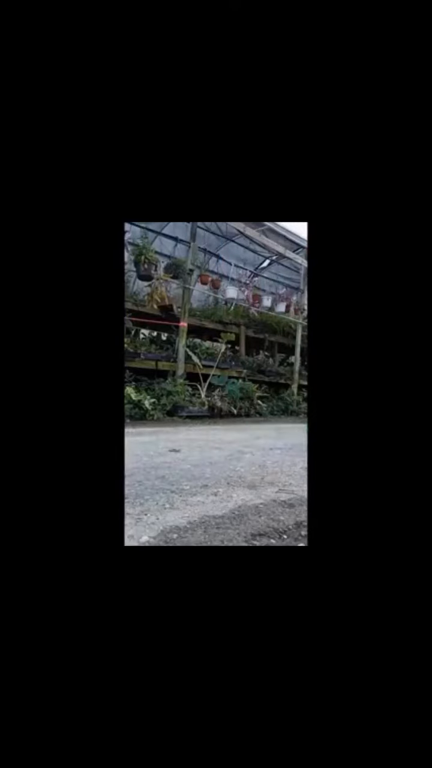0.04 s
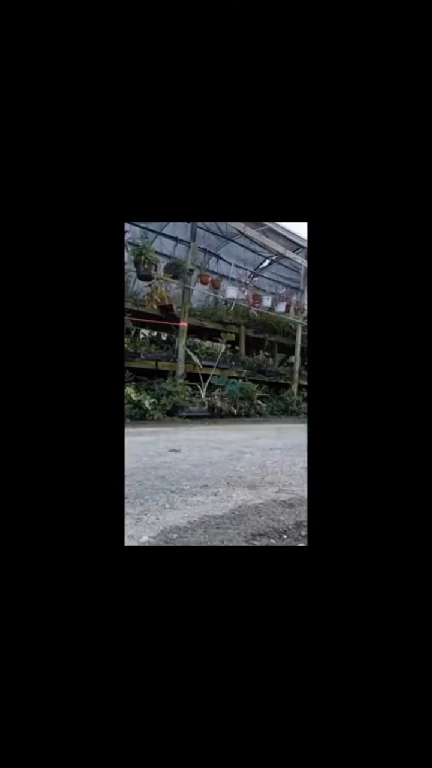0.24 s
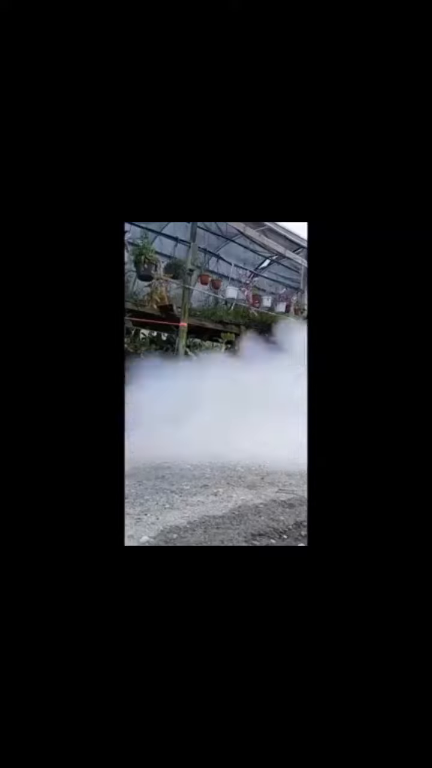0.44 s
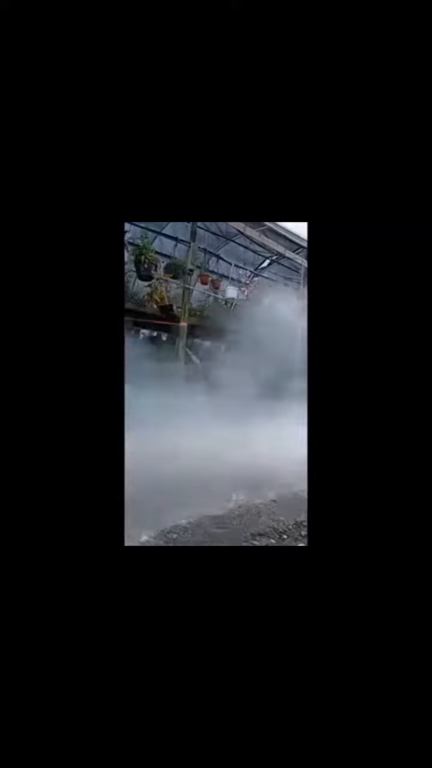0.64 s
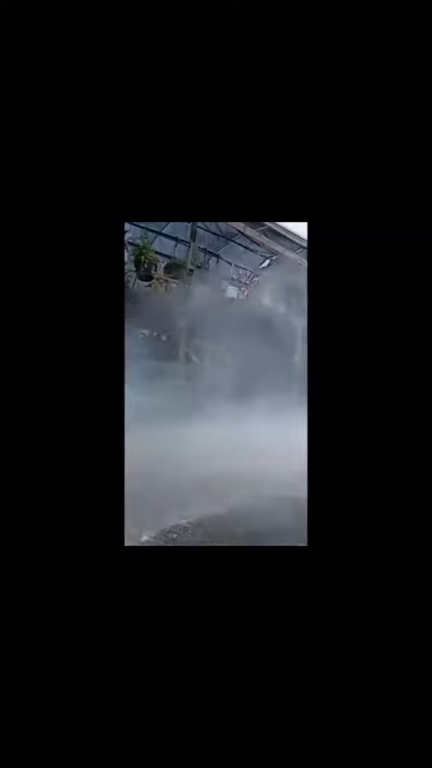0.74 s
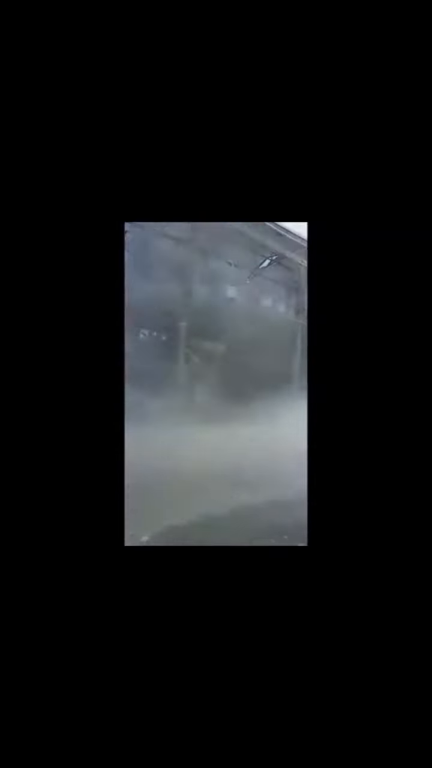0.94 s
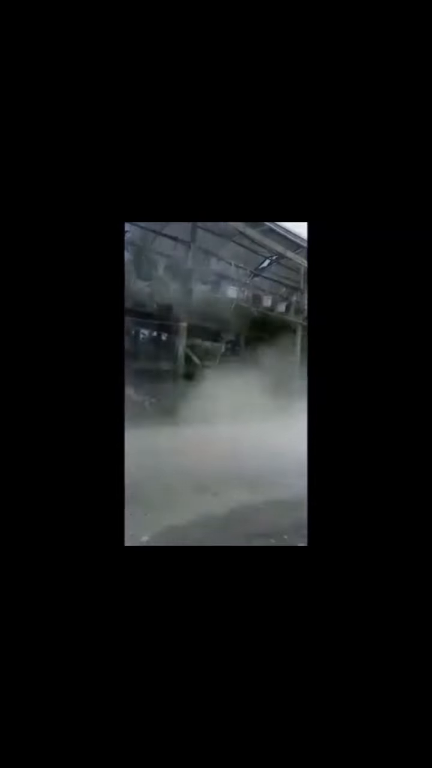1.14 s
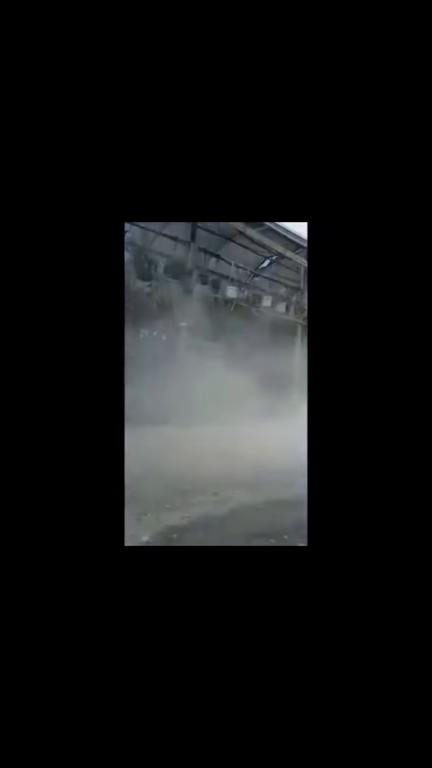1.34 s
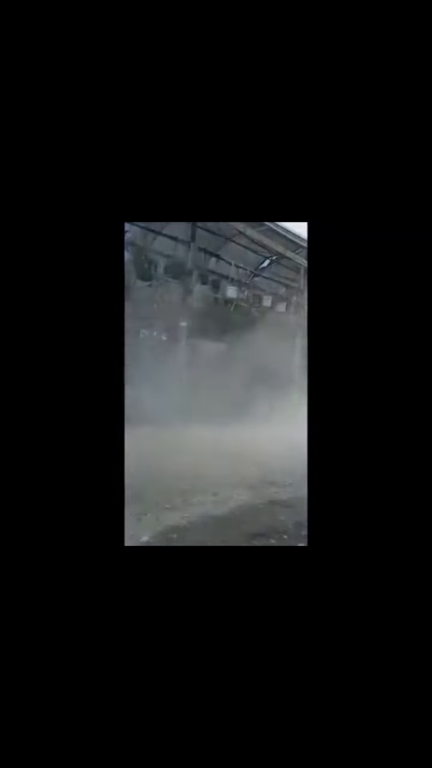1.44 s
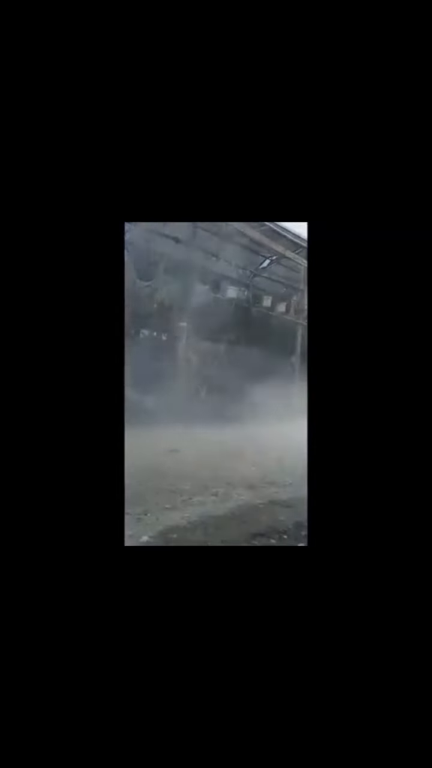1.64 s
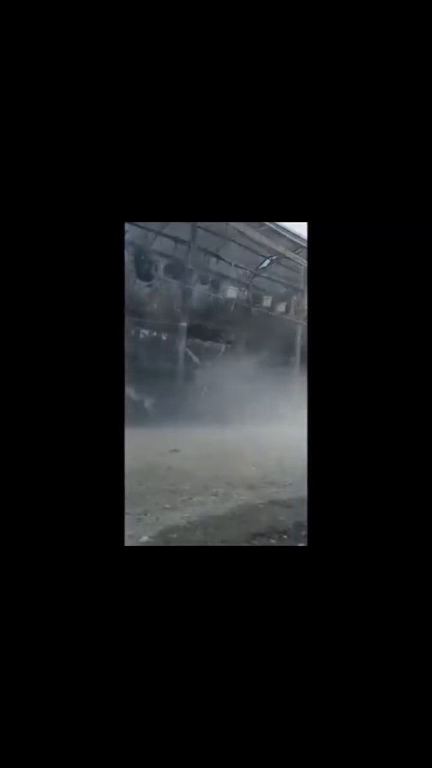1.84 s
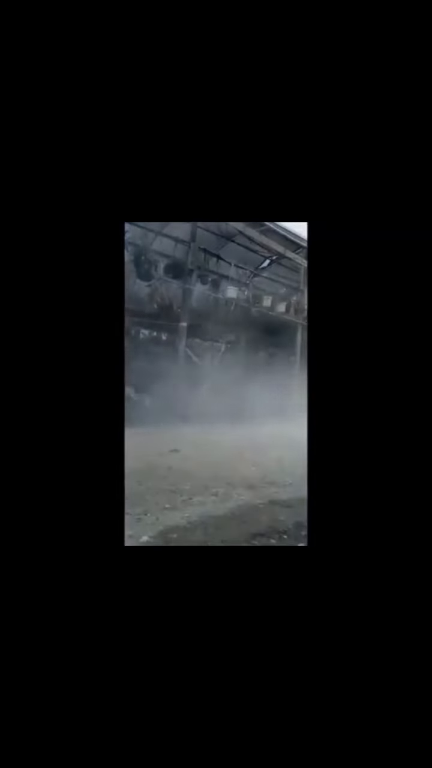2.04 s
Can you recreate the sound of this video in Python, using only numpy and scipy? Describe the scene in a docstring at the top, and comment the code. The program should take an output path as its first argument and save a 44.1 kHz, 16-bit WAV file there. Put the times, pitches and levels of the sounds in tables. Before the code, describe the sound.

A small rocket motor sputters, pops and bursts into a crackling roar, then hisses away outdoors

```python
"""A small rocket motor burns on open gravel, a few metres from a phone: its jet is shaped, flickering noise.
First the fuse sputters in short bursts of grit and the igniter pops as a sharp pressure pulse. The jet swells
to a crackling roar that overloads the microphone, settles to a hiss and dies away; gliding bands of noise
make brief nozzle whistles, and low rumble makes gusts. A distant machine hums as two wandering tones over
coloured outdoor noise; both sink while the jet is loud."""
import sys
import numpy as np
from scipy import signal
from scipy.fft import rfft, irfft
from scipy.io import wavfile

SR = 44100
rng = np.random.default_rng(int(sys.argv[2]) if len(sys.argv) > 2 else 0)


def output_pcm(signal):
    """Save a mono or channel-first signal as 16-bit PCM at the path in sys.argv[1].

    Samples are clipped to [-1, 1] before scaling.
    """
    pcm = np.clip(np.atleast_2d(signal).T, -1, 1) * 32767
    wavfile.write(sys.argv[1], SR, np.round(pcm).astype(np.int16))


N = 92610  # length of the scene in samples (2.1 s)

# rise and fall of the outdoor noise, relative to OUTDOOR_DB: (time [s], level [dB])
OUTDOOR_LEVEL = [(0, 2.5), (.05, 3.5), (.075, 1), (.125, -0.5), (.155, 2.5), (.185, 1.5), (.215, -9),
                 (.255, 1.5), (.33, -5.5), (.6, -10), (1.15, -11.5), (1.45, -18), (1.62, -23), (1.76, -11),
                 (1.82, -2), (1.86, 2), (2.1, 0.5)]
# tone balance of the outdoor noise: (frequency [Hz], relative level [dB per Hz])
OUTDOOR_COLOUR = [(25, -24), (70, -8.5), (130, 2.5), (200, -1.5), (400, -9), (550, -3), (700, -7.5),
                  (850, -4), (1100, -8), (1600, -6.5), (2700, -13.5), (4000, -15), (5300, -23.5),
                  (7400, -19), (10000, -30.5), (13500, -44), (14500, -65)]
OUTDOOR_DB = -31.5
# loudness of the distant machine's low tone, before its flutter: (time [s], level [dB])
HUM_LEVEL = [(0, -39), (.185, -41), (.225, -60), (.265, -34), (.3, -43), (.7, -57), (.85, -55), (1.17, -47),
             (1.45, -51), (1.6, -62), (1.84, -56), (1.9, -32), (1.945, -39), (1.99, -30.5), (2.1, -34)]
# loudness of its upper tone, before its flutter: (time [s], level [dB])
UPPER_HUM_LEVEL = [(0, -37), (.04, -33.5), (.185, -39.5), (.215, -60), (.255, -34.5), (.31, -38),
                   (.37, -48), (.9, -58)]
HUM_HZ, UPPER_HUM_HZ = 126.3, 238.7
HUM_WANDER, HUM_FLUTTER_DB = .005, .7  # typical pitch drift as a fraction, typical level drift

# sputters of the fuse: (time [s], level before the burst shape [dB], low-pass corner [Hz])
SPUTTERS = [(.008, -24, 12000), (0.028, -18, 1500), (0.051, -24, 7000), (0.083, -24.5, 9000),
            (0.101, -26, 9000), (0.138, -22.5, 1100), (0.145, -21.5, 12000), (0.159, -22, 1200)]
# tone balance of the fuse and the gravel scatter: (frequency [Hz], relative level [dB per Hz])
SPUTTER_COLOUR = [(50, -15), (150, -11), (600, -2), (1500, -1.5), (2700, -6), (3800, 0.5), (5300, -17.5),
                  (7400, -6), (9500, -15.5), (14000, -23)]
SPUTTER_ATTACK_S, SPUTTER_DECAY_S = 0.00053, 0.0072

# sharp pops, the igniter and then full thrust: (time [s], pulse level [dB])
POPS = [(.20531, -2.3), (.3775, -1)]
POP_LENGTH_S, POP_FRONT_S = .00007, .000025
POP_BOUNCE_S, POP_BOUNCE_DB = .00037, -2.5  # spacing and relative level of the bounce
POP_TAIL_DB, POP_TAIL_S = -21, .011  # gravel scatter relative to the pop, and its decay

# loudness of the jet's hiss before the trim HISS_DB: (time [s], level [dB])
HISS_LEVEL = [(.215, -21.5), (.25, -20.5), (.33, -16.5), (.365, -13.8), (.382, -11), (.44, -8), (.55, -8.5),
              (.67, -14), (.99, -14), (1.06, -14.5), (1.2, -14), (1.35, -13.5), (1.4, -15), (1.47, -12.5),
              (1.51, -14), (1.725, -16), (1.768, -22.5), (1.8, -20), (1.93, -26.3), (2.02, -27), (2.1, -33)]
# loudness of the jet's low roar before the trim ROAR_DB: (time [s], level [dB])
ROAR_LEVEL = [(.21, -62), (.26, -29), (.357, -29), (.374, -20.5), (.43, -13), (.58, -17), (.66, -17.5),
              (.8, -20), (.92, -25), (1.25, -32.5), (1.72, -36), (1.8, -42)]
HISS_DB, ROAR_DB = -0.36, -0.5
# tone balance of the hiss while the motor flares: (frequency [Hz], relative level [dB per Hz])
FLARE_COLOUR = [(100, -44), (600, -14), (1300, -4.5), (2500, -5.5), (2900, -5.5), (3400, 0), (4050, -1),
                (4400, -6.5), (4850, -10.5), (5600, -8), (6500, -2.5), (7100, 2), (7900, 0), (8500, -2),
                (9300, -3.5), (10400, -7), (11600, -10.5), (12700, -14), (13500, -16), (15500, -29)]
# tone balance of the hiss once settled: (frequency [Hz], relative level [dB per Hz])
HISS_COLOUR = [(100, -29), (300, -19.5), (600, -13.5), (1200, -9.5), (2000, -6.5), (2900, -2.5),
               (4100, 0.5), (4600, -3.5), (5200, -9.5), (5900, -8.5), (6500, -4), (7100, -.5), (7900, -0.5),
               (8500, -4.5), (9700, -4), (11500, -8.5), (12700, -12), (13600, -15.5), (14100, -57)]
SETTLE_S, SETTLE_LENGTH_S = 0.43, 0.25  # start and length of the change from flare to settled hiss
# tone balance of the roar as it breaks out: (frequency [Hz], relative level [dB per Hz])
BREAKOUT_COLOUR = [(40, -25), (120, -12), (300, -4.5), (600, 2), (1200, 3.5), (1700, 4.5), (2400, -1.5),
                   (3500, -2), (5000, -21), (8000, -0.5), (14000, -28)]
# tone balance of the roar afterwards: (frequency [Hz], relative level [dB per Hz])
ROAR_COLOUR = [(40, -25), (120, -11.5), (300, -6.5), (600, -0.5), (1000, 2.5), (1450, 3), (2400, 4.5),
               (3500, -3.5), (5000, -24), (8000, -1), (13500, -27), (14500, -55)]
BREAKOUT_END_S, BREAKOUT_FADE_S = .44, .06
# dulling of the hiss as the chamber empties: (time [s], gain of the top treble [dB])
TREBLE = [(1.75, 1), (1.9, -2.5), (2.1, -25)]
TREBLE_HZ = 7150
# resonances that colour the jet, before they wander: (centre [Hz], width [Hz], lift [dB])
RESONANCES = [(866, 70, 2.5), (1053, 69, 2), (1235, 84, 3.5), (1460, 64, 3.5), (1620, 50, 2.5),
              (1820, 120, 2), (2300, 130, 3), (2680, 160, 1)]
RESONANCE_DRIFT, RESONANCE_DRIFT_PER_S = .02, 9  # pitch shift as a fraction, changes per second
# spurts of bright sizzle before the jet's flutter: (start [s], length [s], level [dB])
SIZZLES = [(0.181, 0.037, -37), (1.004, 0.13, -18), (1.3, 0.087, -21)]
SIZZLE_HZ, SIZZLE_WIDTH_HZ = 9350, 3700
# flicker of the exhaust's eddies, strongest in the blast: (time [s], spread [dB])
EDDIES = [(.25, 1.6), (.45, 2.2), (.7, 1.5), (1.65, 1.3), (1.8, .7)]
EDDY_DB, EDDY_PER_S = 1.5, 34.7  # flicker spread outside the jet; flicker speed everywhere
SHOCKS_PER_S, SHOCK_SPREAD_DB, SHOCK_DB = 3500, 2.5, -4
FLUTTER_DB, FLUTTER_PER_S = 0.38, 43
CATCH_S, CATCH_RISE_S = .213, .024  # when the motor catches, and how long it takes to open up
VORTICES_PER_S, VORTEX_S, VORTEX_DB = 42, .06, -14.5  # level is relative to the gas noise
VORTEX_LOW_HZ, VORTEX_HIGH_HZ = 800, 4600

# breathy resonances of the nozzle:
# (start [s], length [s], first pitch [Hz], last pitch [Hz], width [Hz], level [dB])
WHISTLES = [(0.246, 0.092, 3950, 4030, 346, -29), (.48, 0.126, 3350, 3444, 1000, -19),
            (0.472, 0.11, 4000, 4060, 300, -22.5), (0.847, .11, 3850, 3860, 300, -26),
            (1.029, 0.095, 3480, 3420, 300, -25.5), (1.101, 0.076, 4180, 4050, 170, -24),
            (1.125, .06, 3800, 3680, 170, -26), (1.263, 0.15, 4130, 4010, 150, -25.5),
            (1.407, .07, 4100, 4220, 400, -27), (1.435, 0.062, 3450, 3140, 700, -20),
            (1.596, 0.033, 3610, 3760, 250, -20), (1.946, 0.1, 2780, 2990, 170, -34),
            (1.981, 0.1, 1540, 1620, 130, -42)]

# gusts of exhaust that buffet the microphone: (start [s], length [s], level [dB])
GUSTS = [(0.406, 0.18, -27), (1.023, 0.058, -32.5), (1.294, 0.051, -36)]
# tone balance of their rumble: (frequency [Hz], relative level [dB per Hz])
RUMBLE_COLOUR = [(20, -16), (45, -9), (130, 0), (300, 0.5), (600, 2), (2000, -52)]

# echoes from the ground and nearby racks: (delay [s], level relative to the motor [dB])
ECHOES = [(.00482, -24.5), (.00682, -16.5), (0.0137, -14.5)]
CLIP_LEVEL, TOP_HZ = .9, 15600  # peak ceiling in the microphone, highest frequency kept


def undb(db):
    """Turn decibels into a gain."""
    return 10 ** (np.asarray(db) / 20)


def unit(x):
    """Scale a sound to an average strength (rms) of 1."""
    return x / (np.std(x) + 1e-12)


def noise():
    """White noise: every frequency equally strong."""
    return rng.standard_normal(N)


def clock():
    """Time of each sample in seconds."""
    return np.arange(N) / SR


def curve(rows):
    """Gain that follows (time, dB) points."""
    times, db = np.array(rows).T
    return undb(np.interp(clock(), times, db))


def colour(x, points):
    """Reshape the frequencies of x by (Hz, dB) points and scale it to rms 1."""
    hz, db = np.array(points).T
    freqs = np.maximum(np.fft.rfftfreq(N, 1 / SR), 1)
    gain = undb(np.interp(np.log(freqs), np.log(hz), db))
    return unit(irfft(rfft(x) * gain, N))


def filtered(x, hz, kind, order=2):
    """Keep part of the frequency range with a smooth (Butterworth) filter."""
    edges = np.clip(hz, 10, .45 * SR)
    return signal.sosfilt(signal.butter(order, edges, kind, fs=SR, output="sos"), x)


def walk(rate):
    """Smooth random wandering, about rate changes a second, with a spread of 1."""
    return colour(noise(), [(1, 0), (rate / 2, 0), (rate * 2, -60), (rate * 4, -120)])


def swell(start, length, edge):
    """A loudness shape that opens, holds and closes with soft edges."""
    t = clock() - start
    return (1 + np.tanh(t / edge)) * (1 + np.tanh((length - t) / edge)) / 4


def burst(start, attack, decay):
    """A quick rise and an exponential fall."""
    t = np.maximum(clock() - start, 0)
    return (1 - np.exp(-t / attack)) * np.exp(-t / decay)


def fade(start, length):
    """A straight line from 0 to 1."""
    return np.clip((clock() - start) / length, 0, 1)


def turbulence(eddy_db):
    """Mixing gas: bands of noise that flicker with their own eddies, peppered with tiny shocks."""
    edges = np.geomspace(300, 16000, 18)
    gas = filtered(noise(), edges[0], "low")  # the lowest band stays steady
    for low, high in zip(edges, edges[1:]):
        flicker = undb(eddy_db * walk(EDDY_PER_S))
        gas = gas + filtered(noise(), [low, high], "band") * flicker
    sizes = undb(SHOCK_SPREAD_DB * np.minimum(rng.exponential(size=N), 3.5))
    happens = rng.random(N) < SHOCKS_PER_S / SR
    shocks = happens * sizes * np.sign(noise())
    return unit(gas) + undb(SHOCK_DB) * unit(shocks)


def outdoor_noise():
    """Gas-like noise given an outdoor tone balance and a changing level."""
    return undb(OUTDOOR_DB) * colour(turbulence(EDDY_DB), OUTDOOR_COLOUR) * curve(OUTDOOR_LEVEL)


def machine_hum():
    """Two tones of a distant machine, each drifting slightly in pitch and level."""
    out = np.zeros(N)
    for hz, levels in [(HUM_HZ, HUM_LEVEL), (UPPER_HUM_HZ, UPPER_HUM_LEVEL)]:
        pitch = hz * (1 + HUM_WANDER * walk(13.5))
        tone = np.sqrt(2) * np.sin(2 * np.pi * np.cumsum(pitch) / SR)
        out += tone * curve(levels) * undb(HUM_FLUTTER_DB * walk(25))
    return out


def fuse():
    """Short gritty sputters before the motor catches: bursts of noise, some dull and some bright."""
    grit = colour(turbulence(EDDY_DB), SPUTTER_COLOUR)
    out = np.zeros(N)
    for start, db, corner_hz in SPUTTERS:
        sputter = unit(filtered(grit, corner_hz, "low"))
        out += undb(db) * sputter * burst(start, SPUTTER_ATTACK_S, SPUTTER_DECAY_S)
    return out


def shock(at):
    """A pressure pulse that builds, flips sharply from positive to negative, and recovers."""
    t = clock() - at
    outside_front = np.maximum(np.abs(t) - POP_FRONT_S, 0)
    return -np.tanh(t / POP_FRONT_S) * np.exp(-outside_front / POP_LENGTH_S)


def pops():
    """Each pop is a steep pressure pulse, its inverted bounce off the ground and a scatter from the gravel."""
    gravel = undb(POP_TAIL_DB) * colour(noise(), SPUTTER_COLOUR)
    out = np.zeros(N)
    for start, db in POPS:
        bounce = -undb(POP_BOUNCE_DB) * shock(start + POP_BOUNCE_S)
        scatter = gravel * burst(start, SPUTTER_ATTACK_S, POP_TAIL_S)
        out += undb(db) * (shock(start) + bounce + scatter)
    return out


def vortices():
    """Vortices shed by the jet at random moments: short tones that flare up and fade at random pitches."""
    size = int(VORTEX_S * SR)
    out, t = np.zeros(N + size), np.arange(size) / SR
    for when, pitch in rng.random((int(VORTICES_PER_S * N / SR), 2)):
        hz = VORTEX_LOW_HZ * (VORTEX_HIGH_HZ / VORTEX_LOW_HZ) ** pitch
        start = int(when * N)
        out[start:start + size] += np.hanning(size) * np.sin(2 * np.pi * hz * t)
    return undb(VORTEX_DB) * out[:N]


def lifted(x, scale):
    """Boost the resonant bands; a larger scale moves them lower in pitch."""
    freqs = np.fft.rfftfreq(N, 1 / SR) * scale
    lift_db = sum(db / (1 + (2 * (freqs - hz) / width) ** 2) for hz, width, db in RESONANCES)
    return irfft(rfft(x) * undb(lift_db), N)


def resonate(x):
    """Lift narrow bands that wander with the hot gas, without changing the overall level."""
    share = (1 + np.tanh(2 * walk(RESONANCE_DRIFT_PER_S))) / 2
    higher, lower = lifted(x, 1 - RESONANCE_DRIFT), lifted(x, 1 + RESONANCE_DRIFT)
    return unit(share * higher + (1 - share) * lower) * np.std(x)


def hiss(gas):
    """The lasting bright part of the exhaust, which settles after the flare and dulls at the end."""
    settled = fade(SETTLE_S, SETTLE_LENGTH_S)
    blend = (1 - settled) * colour(gas, FLARE_COLOUR) + settled * colour(gas, HISS_COLOUR)
    full = blend * curve(HISS_LEVEL) * undb(HISS_DB)
    dull = filtered(full, TREBLE_HZ, "low", order=1)
    return dull + (full - dull) * curve(TREBLE)


def roar(plume):
    """The low part of the exhaust, deeper as it breaks out and early to fade."""
    opened = fade(BREAKOUT_END_S, BREAKOUT_FADE_S)
    blend = (1 - opened) * colour(plume, BREAKOUT_COLOUR) + opened * colour(plume, ROAR_COLOUR)
    return blend * curve(ROAR_LEVEL) * undb(ROAR_DB)


def sizzle():
    """Spurts of bright noise in a band of high frequencies."""
    band = [SIZZLE_HZ - SIZZLE_WIDTH_HZ / 2, SIZZLE_HZ + SIZZLE_WIDTH_HZ / 2]
    spurts = sum(undb(db) * swell(start, length, length / 6) for start, length, db in SIZZLES)
    return unit(filtered(noise(), band, "band", order=3)) * spurts


def jet():
    """The exhaust: turbulent roar, hiss and sizzle, fluttering together with the uneven burn."""
    eddy_db = np.interp(clock(), *np.array(EDDIES).T)
    gas = turbulence(eddy_db) + vortices()
    plume = turbulence(eddy_db) + vortices()
    lit = fade(CATCH_S, CATCH_RISE_S)
    exhaust = resonate(hiss(gas) + roar(plume)) * lit
    return (exhaust + sizzle()) * undb(FLUTTER_DB * walk(FLUTTER_PER_S))


def whistles():
    """Gliding resonances of the nozzle, driven by the flow: narrow noise around a moving pitch."""
    out = np.zeros(N)
    for start, length, first_hz, last_hz, width, db in WHISTLES:
        pitch = np.interp(clock(), [start, start + length], [first_hz, last_hz])
        phase = 2 * np.pi * np.cumsum(pitch) / SR
        # two random strengths blur the pure tone into a breathy band
        tone = walk(width) * np.cos(phase) + walk(width) * np.sin(phase)
        out += undb(db) * tone * swell(start, length, 0.0057)
    return out


def gusts():
    """Low rumble when the exhaust surges: deep noise that swells and fades."""
    surges = sum(undb(db) * swell(start, length, 0.029) for start, length, db in GUSTS)
    return colour(noise(), RUMBLE_COLOUR) * surges


def with_echoes(motor):
    """Add delayed copies, then scale down to make up for their added energy."""
    echoes = np.zeros(N)
    for delay, db in ECHOES:
        echoes += undb(db) * np.pad(motor, (int(abs(delay) * SR), 0))[:N]
    return (motor + echoes) / np.sqrt(1 + sum(undb(db) ** 2 for _, db in ECHOES))


def scene():
    """The motor with its echoes over the background, the same in both channels."""
    background = outdoor_noise() + machine_hum()
    motor = fuse() + jet() + whistles()
    mono = background + with_echoes(motor) + pops() + gusts()
    return np.array([mono, mono])


def record(dry):
    """The phone flattens the highest peaks and cuts the top frequencies."""
    clipped = dry / (1 + (dry / CLIP_LEVEL) ** 8) ** (1 / 8)
    return signal.sosfilt(signal.ellip(8, .2, 70, TOP_HZ, fs=SR, output="sos"), clipped)


dry = scene()
out = record(dry)
output_pcm(out)
```